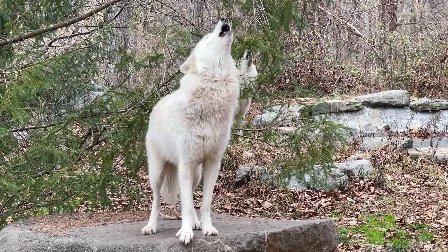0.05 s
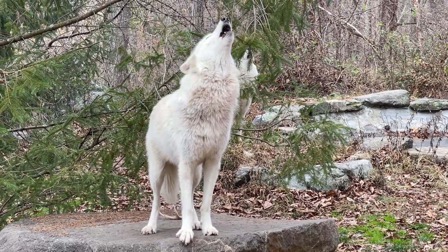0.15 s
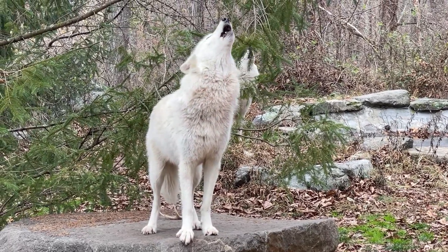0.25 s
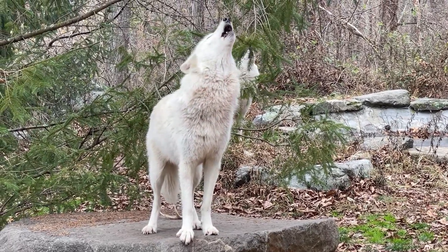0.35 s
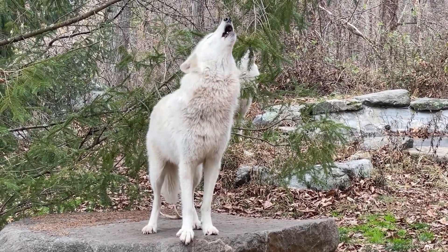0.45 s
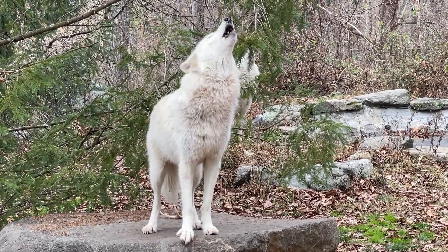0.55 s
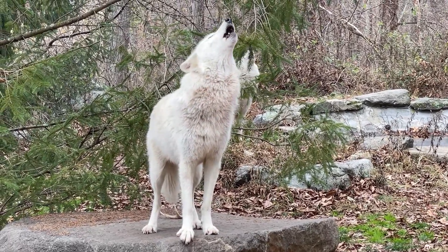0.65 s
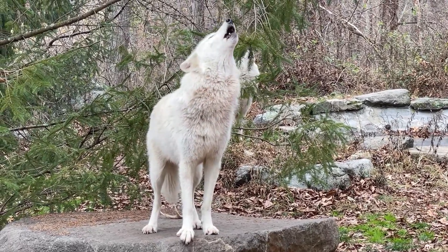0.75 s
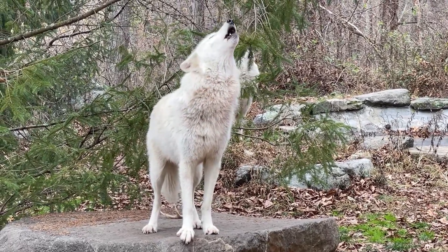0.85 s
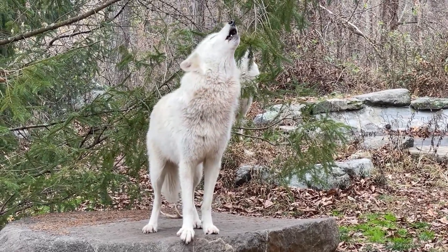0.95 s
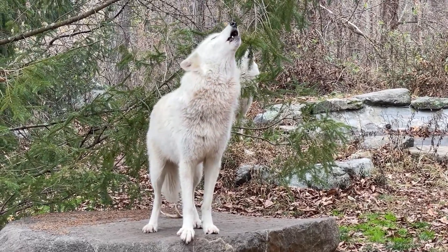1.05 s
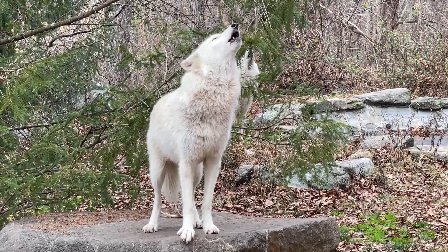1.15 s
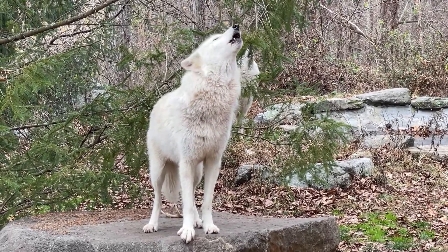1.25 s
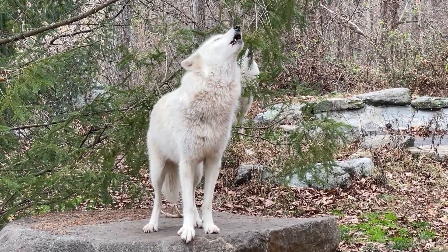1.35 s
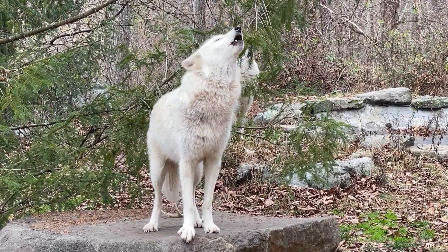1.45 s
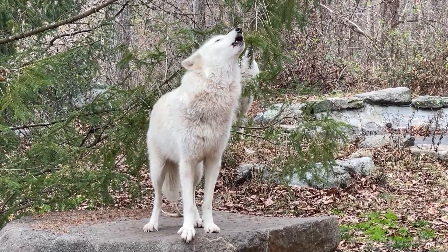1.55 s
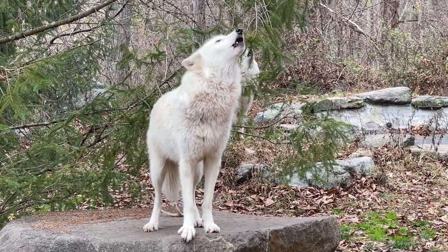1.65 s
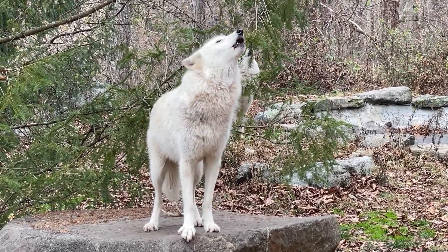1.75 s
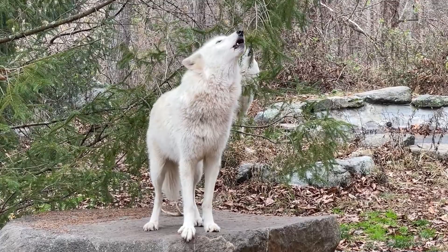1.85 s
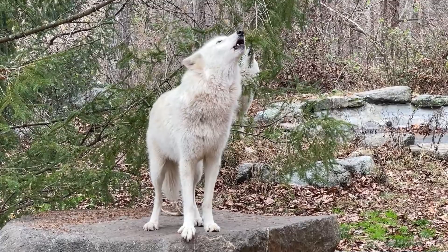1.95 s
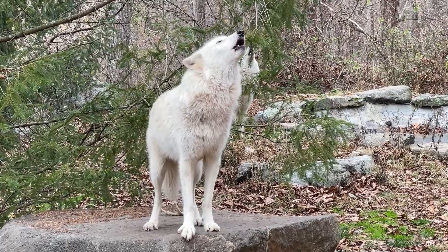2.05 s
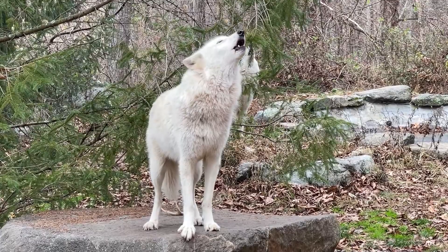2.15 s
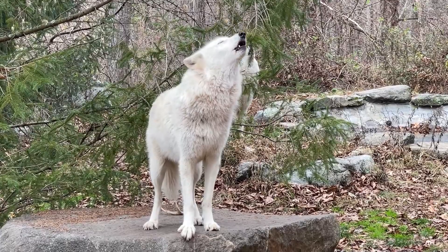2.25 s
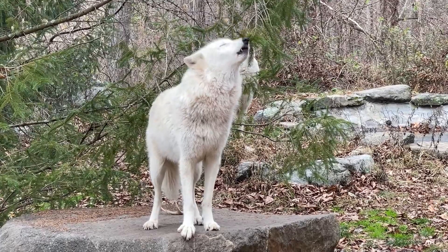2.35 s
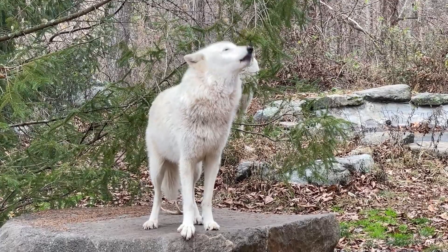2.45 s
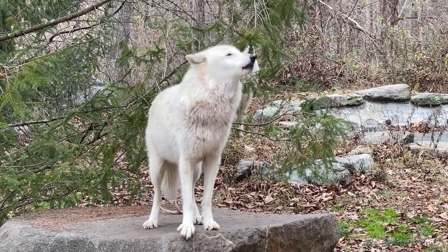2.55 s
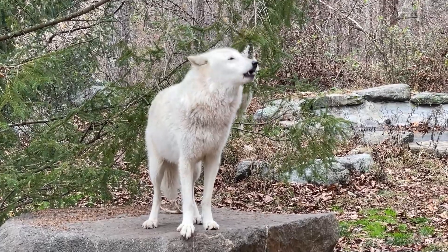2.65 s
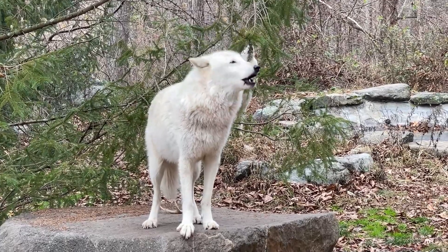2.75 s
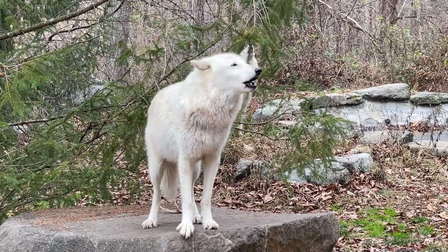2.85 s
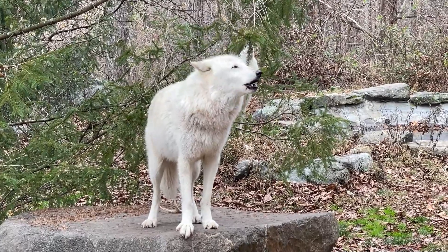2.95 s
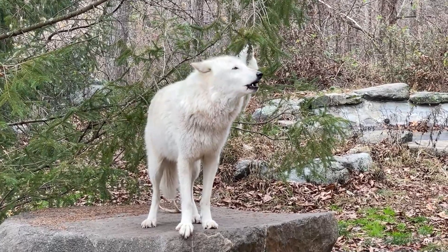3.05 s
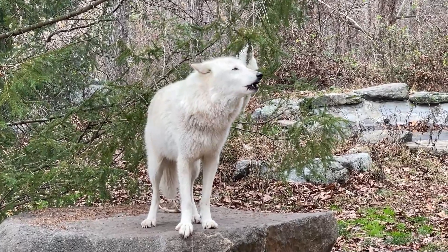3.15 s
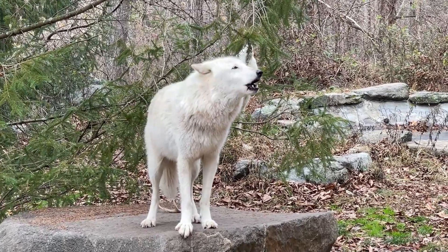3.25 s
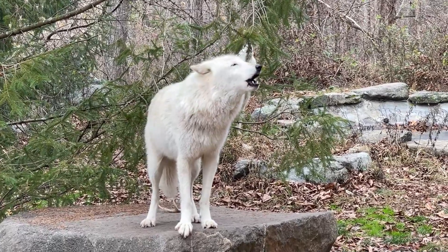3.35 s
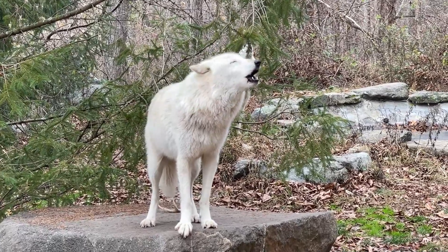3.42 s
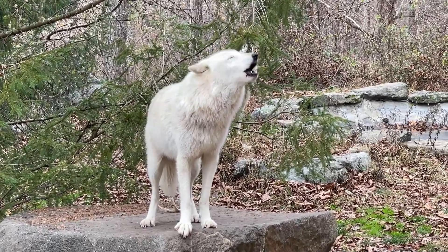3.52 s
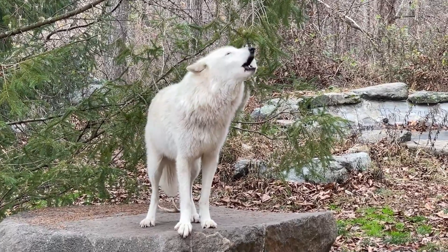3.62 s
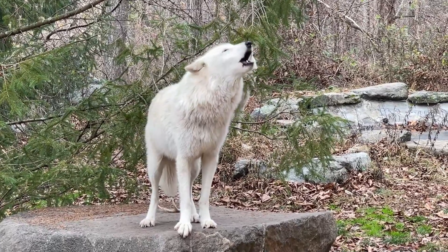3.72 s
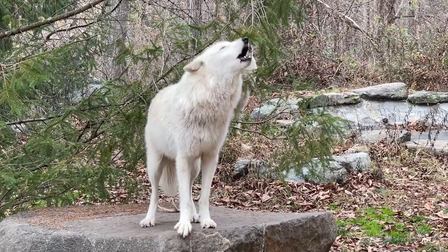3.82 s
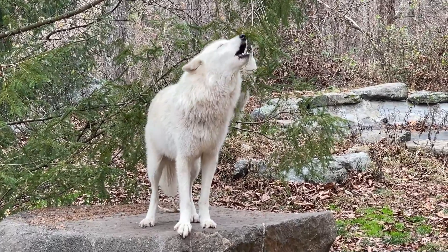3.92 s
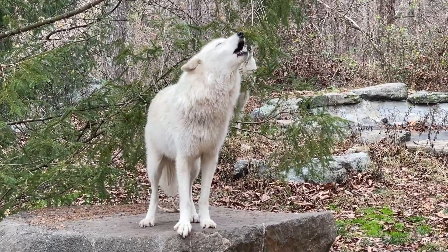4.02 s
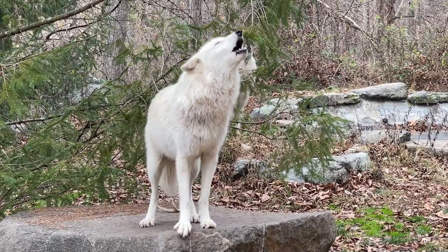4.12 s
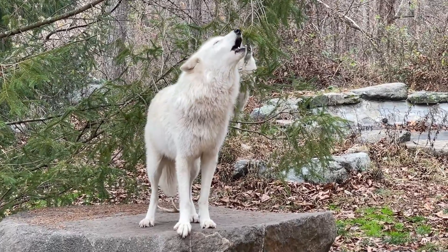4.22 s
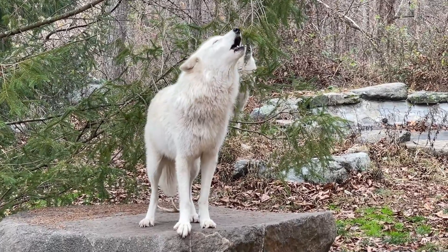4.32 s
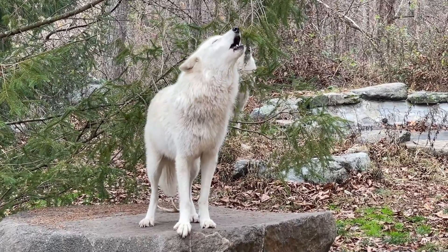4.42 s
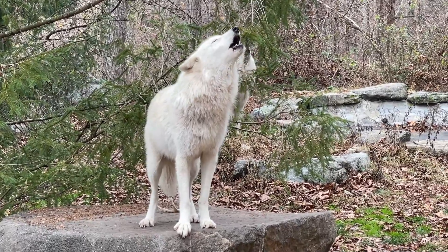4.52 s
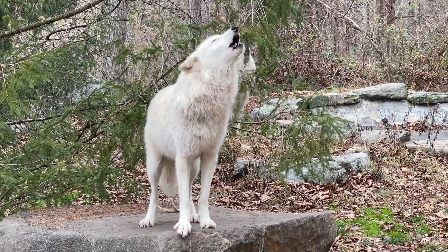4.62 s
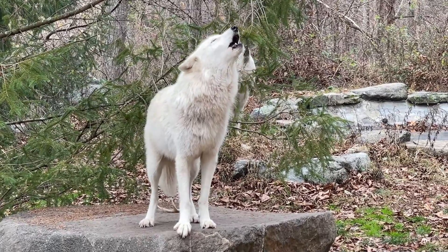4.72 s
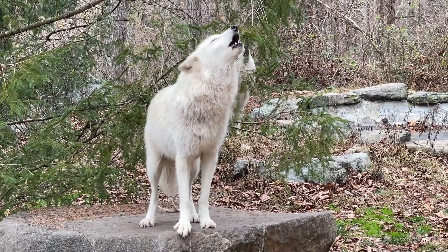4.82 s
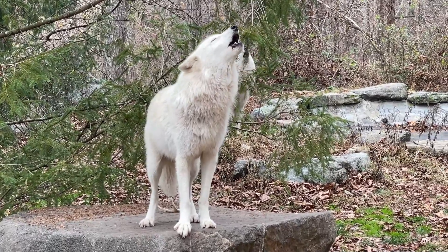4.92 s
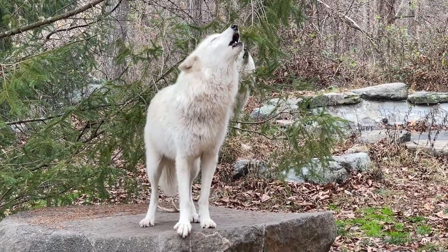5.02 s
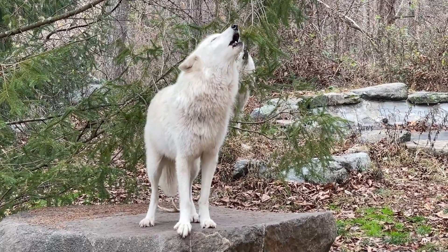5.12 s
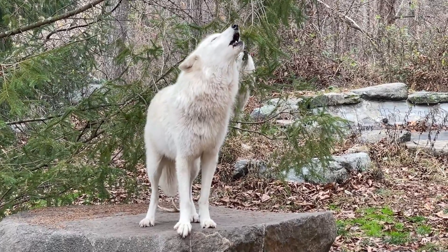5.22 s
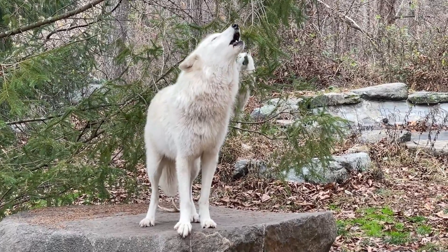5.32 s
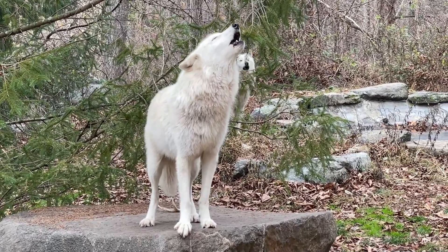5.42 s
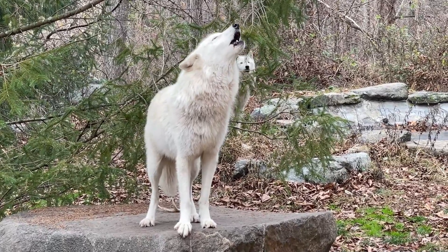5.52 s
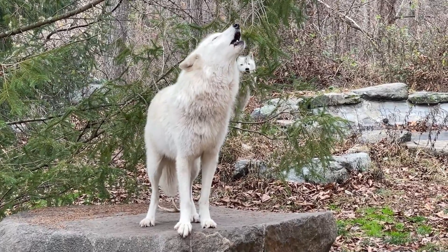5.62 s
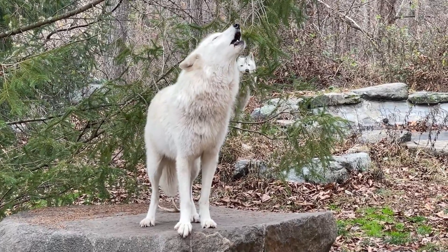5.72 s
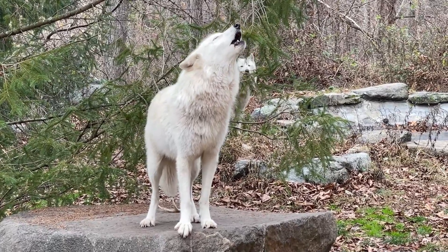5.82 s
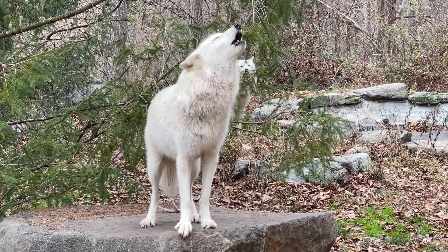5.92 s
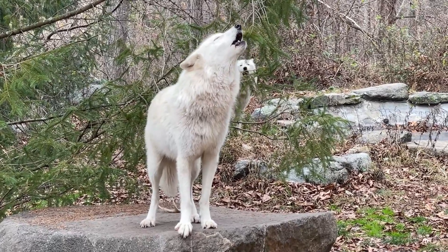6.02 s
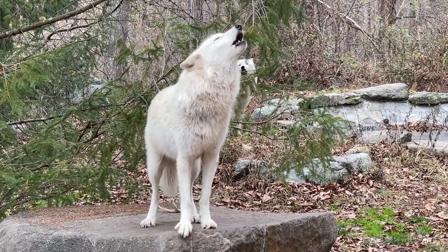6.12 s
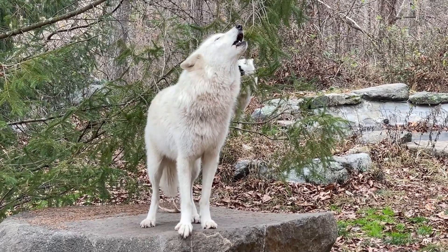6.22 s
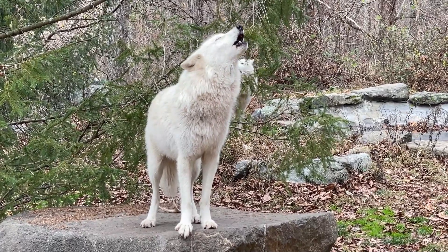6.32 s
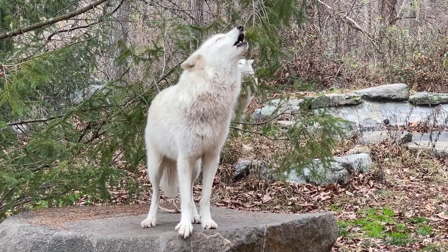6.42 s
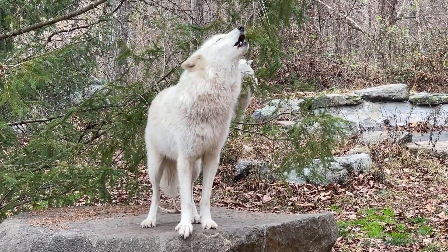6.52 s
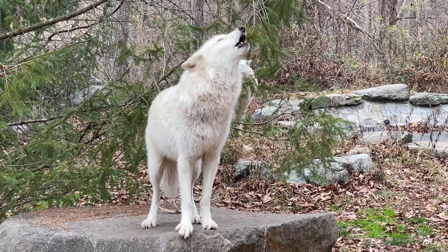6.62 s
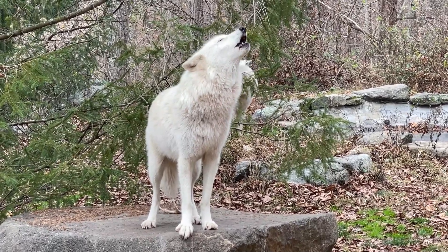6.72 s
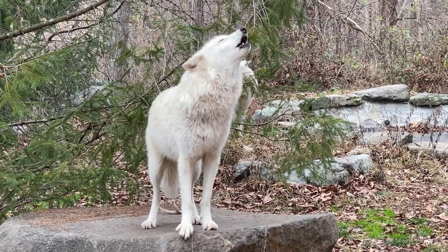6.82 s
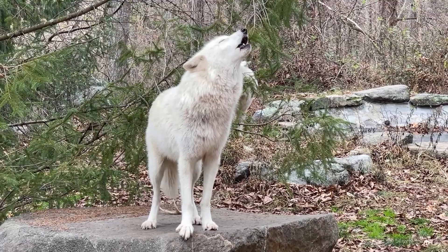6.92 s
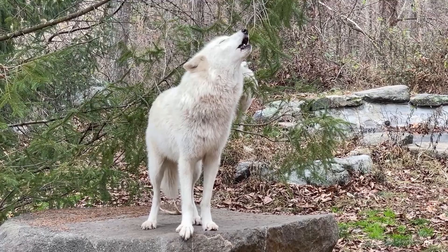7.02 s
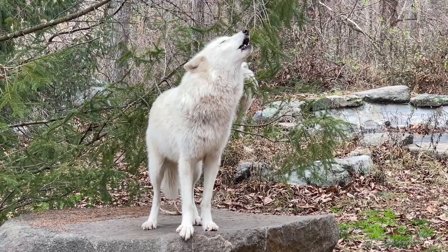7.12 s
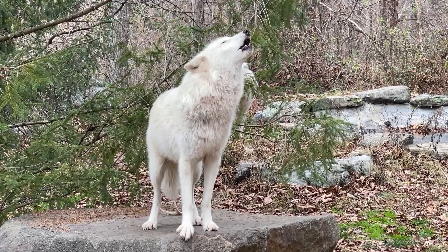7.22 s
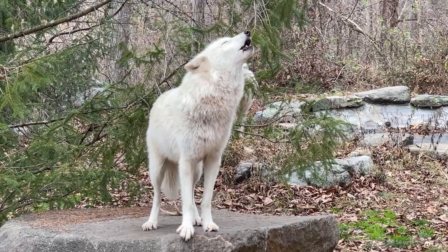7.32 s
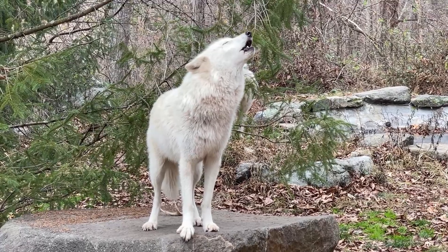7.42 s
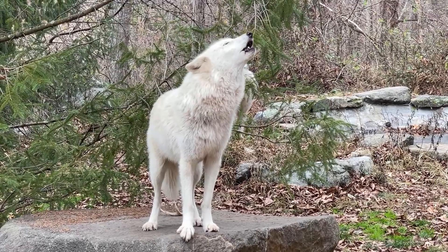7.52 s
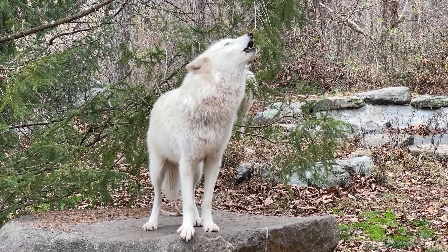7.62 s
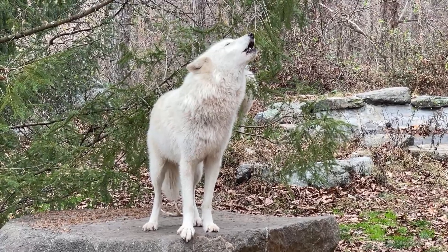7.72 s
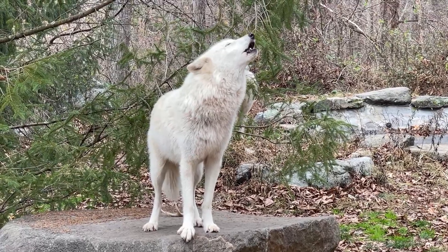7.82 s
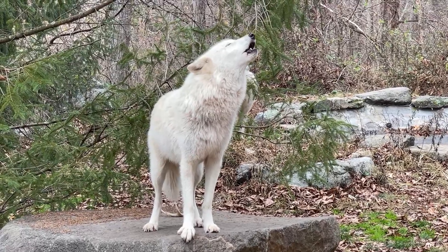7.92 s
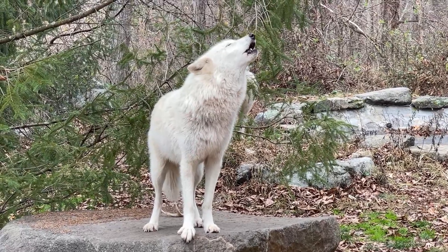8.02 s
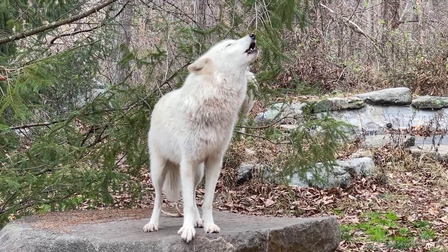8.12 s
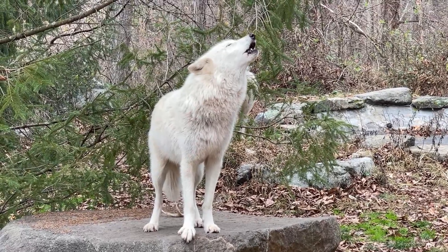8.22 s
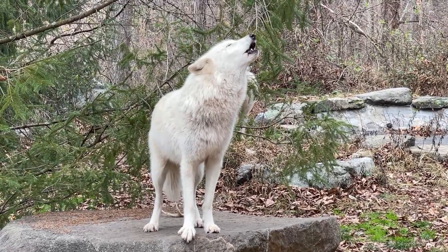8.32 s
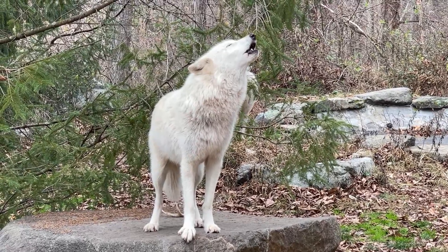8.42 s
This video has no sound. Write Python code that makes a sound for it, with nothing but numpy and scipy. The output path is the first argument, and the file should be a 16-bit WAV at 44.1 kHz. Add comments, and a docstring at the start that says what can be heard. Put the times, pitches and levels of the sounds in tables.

```python
"""Wolf duet in a wood

Two wolves howl almost dead centre of a microphone pair, their vocal folds ringing through throat and
mouth. The lower sings, pauses, returns cracked and rasping, then holds a long pure note; the higher
slides down, trails off and rises again. Behind them: a low hush and a faint echo off the trunks, with
two soft thuds on the ground near the end. A phone's limiter holds down the loudest peaks."""
import sys
import numpy as np
from scipy import signal
from scipy.fft import rfft, irfft, next_fast_len
from scipy.io import wavfile
from scipy.ndimage import uniform_filter1d

SR = 44100
rng = np.random.default_rng(int(sys.argv[2]) if len(sys.argv) > 2 else 0)


def pcm_store(signal):
    """Save signal as 16-bit PCM."""
    levels = np.round(np.clip(np.atleast_2d(signal), -1, 1) * 32767)
    wavfile.write(sys.argv[1], SR, levels.astype(np.int16).T)


N = 373086
TIME = np.arange(N) / SR

# the course of each howl, brighter as the mouth opens: time_s, pitch_hz, level_db, brightness_db
LOW_FIRST = [(0, 483.7, -13, 7.5), (.145, 465.7, -14, 1.5), (.2, 405, -10, -1.5), (.35, 396, -12.5, 2),
             (.56, 400.9, -12.5, 0.5), (.86, 419.5, -12, 0.5), (1.28, 375, -15, -2.5),
             (1.86, 354.6, -14, -0.5), (2.06, 413.2, -13, -4), (2.2, 400.6, -13.5, -7)]
LOW_CRACKED = [(3.27, 338, -28.5, 1.5), (3.39, 360.9, -24.5, 5), (3.405, 446, -7.5, -10.5),
               (3.515, 452, -10, -10), (3.545, 465.3, -22, 4), (3.66, 467, -25.5, 10.5),
               (3.8, 471.2, -16.5, 2.5), (4.14, 470.3, -15.5, 0.5), (4.4, 451, -21.5, 6)]
LOW_LONG = [(4.955, 498, -14.5, 1.5), (5.085, 473, -10.5, 3.5), (5.108, 424.6, -8, -0.5),
            (5.22, 422.1, -9.5, 0), (5.75, 414.7, -10, 0.5), (6.05, 403.7, -10.5, 4.5),
            (6.35, 397.9, -10.5, -0.5), (6.87, 385.6, -11.5, -5), (7.5, 379, -12, 1.5),
            (8.16, 381.6, -11, 1), (8.46, 391.7, -12, -5)]
HIGH_FALLING = [(0, 805, -19.5, 6), (.16, 781, -19.5, 0), (.23, 726, -16.5, -8.5),
                (.33, 704.7, -13.5, -8.5), (.65, 705, -15, -10.5), (1.1, 684.2, -17, -6),
                (1.46, 656, -19, -3.5), (1.65, 607, -22, -6.5), (1.71, 556, -27.5, 4),
                (2.1, 565.8, -31.5, 7), (2.43, 561, -24.5, 8), (2.6, 556.4, -24.5, 1.5),
                (2.96, 555.5, -23.5, 0), (3.16, 547, -25.5, 1.5), (3.75, 544.9, -29.5, 0.5),
                (4.95, 535, -29.5, 1), (5.26, 521, -41.5, 3.5), (5.42, 469, -44, 1)]
HIGH_RISING = [(6.1, 285, -57.5, 1), (6.4, 334.8, -57, 0), (6.56, 305.8, -41.5, -5.5),
               (6.78, 338.5, -46, 1), (7, 370.4, -22, -13.5), (7.38, 420, -32, -1.5),
               (7.415, 508.4, -40, 7.5), (7.6, 519, -42, 14), (7.81, 544, -39.5, 9.5), (8.15, 522, -43, 15),
               (8.29, 574.6, -39.5, 10), (8.46, 578.7, -39, 12.5)]
# throat and mouth resonances for each howl and for the second tone: frequency_hz, gain_db
LOW_FIRST_THROAT = [(1080, -8), (1250, -8), (1450, -22.5), (1650, -17), (1900, -15.5), (2150, -3.5),
                    (2400, -26.5), (2900, -41.5), (3300, -32), (3800, -44), (4200, -44), (4700, -35),
                    (5400, -47.5), (6200, -42), (7500, -54.5), (11000, -55.5)]
LOW_CRACKED_THROAT = [(1300.0, -1), (1420.0, 3.5), (1600.0, -33.5), (1870.0, 5), (2100.0, 3.5),
                      (2350.0, -29), (2800.0, -22.5), (3700.0, -20.5), (4300.0, -16), (4900.0, -48),
                      (5600.0, -23.5), (7000.0, -50.5), (9500.0, -36.5), (11000.0, -42.5)]
LOW_LONG_THROAT = [(1130.0, -4), (1280.0, -9), (1500.0, -40.5), (1680.0, 4), (1900.0, -5.5), (2120.0, -5),
                   (2400.0, -34.5), (3000.0, -36), (3900.0, -34.5), (4800.0, -44), (5700.0, -40.5),
                   (7500.0, -54), (11000.0, -55)]
HIGH_FALLING_THROAT = [(1500, 3.5), (1900, -7), (2200, -9), (2750, -12), (3000, -22), (3190, -7),
                       (3380, -22), (3530, 5), (3950, -6), (4200, -25.5), (4480, -11.5), (5000, -31.5),
                       (6700, -28), (11500, -43.5)]
HIGH_RISING_THROAT = [(900.0, 1.5), (1250.0, -0.5), (1550.0, -19), (1750.0, -19.5), (2100.0, -30.5),
                      (2700.0, -36), (3300.0, -35.5), (4000.0, -30.5), (4700.0, -36), (5500.0, -47.5),
                      (6600.0, -47.5), (8000.0, -56.5), (11000.0, -56)]
SECOND_TONE_THROAT = [(300, -35), (650, 7.5), (930, 3.5), (1160, -3.5), (1360, 4), (1590, -28), (1820, 5.5),
                      (2090, -8), (2380, -26.5), (2750, -27.5), (3200, -30), (3800, -41), (4300, -18.5),
                      (4900, -40.5), (5650, -26.5), (6200, -41.5), (7500, -48.5), (11500, -51)]
# the mouth resonance that lifts the octave as it slides past: centre_hz, width_hz, lift_db
LOW_MOUTH = (960, 91, 11)
HIGH_FALLING_MOUTH = (1115, 170, 27)
HIGH_RISING_MOUTH = (1160, 99, 9.4)
# a voice breaks into chaos: start_s, end_s, attack_s, release_s, first_hz, last_hz, chest_db, rasp_db,
# burst_rate_hz, final_depth_db, wolf, rasp_kind
VOICE_BREAKS = [(0, 0.185, 0.0078, 0.035, 478, 476, -57.5, -42.5, 43, -1, "low", "onset"),
                (0.075, 0.217, 0.074, .04, 480, 419.5, -39, -40, 37, -2.5, "low", "onset"),
                (3.21, 3.418, 0.037, .04, 485, 479.8, -20, -30, 29.2, 6.5, "low", "onset"),
                (3.498, 3.564, 0.032, 0.028, 510, 553, -20.5, -26.5, 40, 1, "low", "onset"),
                (3.62, 4.3, .22, .1, 475, 500, -56, -43, 44, 1, "low", "long"),
                (4.019, 4.995, .3, .05, 575, 511, -18, -23.5, 43.6, 13, "low", "long"),
                (5.058, 5.14, .038, 0.033, 490, 429.8, -27.5, -29.5, 44, 3, "low", "long"),
                (7.376, 7.474, .03, .055, 450, 521.5, -40, -37.5, 40, 4, "high", "onset")]
# the two kinds of rasp in the throat: frequency_hz, gain_db
ONSET_RASP = [(600, -30), (720, -1.5), (890, 0), (1100, 5), (1250, -13.5), (1420, -9.5), (1650, -29.5),
              (1950, -22), (2300, -25), (3100, -27.5), (4400, -40), (6300, -45.5), (9000, -47),
              (12000, -53)]
LONG_RASP = [(620, -23), (740, 13.5), (920, -7.5), (1100, -9), (1280, 5.5), (1420, -20.5), (1540, -39),
             (1740, -6.5), (1900, -17), (2100, -16.5), (2450, -43), (2750, -31.5), (3150, -42.5),
             (3750, -30.5), (4600, -42.5), (5600, -33), (7000, -54.5), (11500, -50.5), (13000, -79.5)]
# the part of a voice that differs between the two microphones: frequency_hz, gain_db
MIC_SPREAD = [(400, -32.5), (600, -19.5), (1100, -17.5), (2000, -17.5), (5000, -10)]
# background air in the wood: frequency_hz, gain_db
AIR_SPECTRUM = [(25, -27.5), (55, -19.5), (78, -13), (115, -5), (160, -10), (240, -13), (450, -5.5),
                (750, -11), (1300, -19.5), (2000, -26.5), (4000, -32.5), (9000, -38.5), (15000, -53)]
# the low background hush, set lower under the loud howls and higher between them: time_s, level_db
HUSH_LEVEL = [(0, -48), (1.2, -51.5), (3, -47), (4.4, -46), (5.8, -54), (8.46, -48)]
# soft thuds on the ground: start_s, level_db
THUDS = [(8.195, -38), (8.28, -35)]


def undb(db):
    """Decibels to gain."""
    return 10 ** (np.asarray(db) / 20)


def curves(table):
    """The columns after time_s, at every sample."""
    time_s, *columns = np.transpose(table)
    return [np.interp(TIME, time_s, column) for column in columns]


def response(spectrum, hz):
    """Gain of a spectrum at the given frequencies."""
    frequency_hz, gain_db = np.transpose(spectrum)
    return undb(np.interp(np.log(hz + 1), np.log(frequency_hz), gain_db))


def colour(x, spectrum):
    """Filter by a spectrum and scale to rms 1."""
    size = next_fast_len(N)
    gain = response(spectrum, np.fft.rfftfreq(size, 1 / SR))
    shaped = irfft(rfft(x, size) * gain, size)[:N]
    return shaped / shaped.std()


def walk(rate_hz):
    """Smooth random drift of spread 1."""
    hold = max(int(SR / rate_hz), 2)
    steps = rng.standard_normal(N)[np.arange(N) // hold]
    drift = uniform_filter1d(uniform_filter1d(steps, hold), hold // 2)
    return drift / drift.std()


def waver(t, depth_db=3, rate_hz=7):
    """A random gain with which one overtone swells and fades on its own."""
    knots = rng.standard_normal(128)
    return undb(depth_db * np.interp(t * rate_hz, np.arange(len(knots)), knots))


def envelope(start_s, end_s, attack_s, release_s):
    """Linear attack, hold and release."""
    return np.clip(np.minimum((TIME - start_s) / attack_s, (end_s - TIME) / release_s), 0, 1)


def progress(start_s, end_s):
    """Runs from 0 to 1 during an event."""
    return np.clip((TIME - start_s) / (end_s - start_s), 0, 1)


def trembling_phase(hz, jitter):
    """Phase of an oscillator whose pitch trembles a little."""
    tremble = 0.37 * walk(160) + walk(35)
    return 2 * np.pi * np.cumsum(hz * (1 + jitter * tremble)) / SR


def howl(course, throat, mouth, octave_db, overtones_db, treble_db, strain_db_per_octave,
         octave_share, attack_s, release_s, jitter, flutter_db):
    """Harmonics of the vocal folds slide through the throat's resonances; an open mouth brightens them."""
    gate = envelope(course[0][0], course[-1][0], attack_s, release_s)
    on = gate > 0
    hz, level_db, bright_db = curves(course)
    phase = trembling_phase(hz, jitter)[on]
    t, hz, level_db, bright_db = TIME[on], hz[on], level_db[on], bright_db[on]
    mouth_hz, width_hz, lift_db = mouth
    mouth_db = lift_db * np.exp(-((2 * hz - mouth_hz) / width_hz) ** 2)
    octave = undb(octave_db + mouth_db + octave_share * bright_db)
    strain_octaves = np.maximum(np.log2(hz / np.median(hz)), 0)
    upper_db = bright_db + flutter_db * walk(25)[on]
    overtones = undb(upper_db + overtones_db)
    treble = undb(upper_db + treble_db + strain_db_per_octave * strain_octaves)
    voice = np.sin(phase) + octave * np.sin(2 * phase)
    for k in range(3, 27):
        treble_share = np.clip((k * hz - 2400) / 600, 0, 1)
        top_fade = np.clip((11800 - k * hz) / 500, 0, 1)
        gain = top_fade * (overtones + treble_share * (treble - overtones))
        voice += gain * response(throat, k * hz) * waver(t) * np.sin(k * phase)
    out = np.zeros(N)
    out[on] = np.sqrt(2) * undb(level_db) * voice
    return out * gate


def low_wolf():
    """The louder voice at the microphones: a first howl, a cracked return, then a long pure note."""
    first = howl(LOW_FIRST, LOW_FIRST_THROAT, LOW_MOUTH,
                 octave_db=-22.5, overtones_db=-29.5, treble_db=-28, strain_db_per_octave=48.5,
                 octave_share=0, attack_s=.0024, release_s=.055, jitter=.002, flutter_db=2.5)
    cracked = howl(LOW_CRACKED, LOW_CRACKED_THROAT, LOW_MOUTH,
                   octave_db=-36, overtones_db=-35, treble_db=-25.5, strain_db_per_octave=1.5,
                   octave_share=.53, attack_s=.031, release_s=.03, jitter=.003, flutter_db=2.5)
    held = howl(LOW_LONG, LOW_LONG_THROAT, LOW_MOUTH,
                octave_db=-24.5, overtones_db=-30.5, treble_db=-35, strain_db_per_octave=53,
                octave_share=-.65, attack_s=.013, release_s=.0017, jitter=.00081, flutter_db=.54)
    return first + cracked + held + voice_breaks("low") + second_tone() + whistle()


def high_wolf():
    """The softer voice: a long falling howl, then one that climbs and jumps up a register."""
    falling = howl(HIGH_FALLING, HIGH_FALLING_THROAT, HIGH_FALLING_MOUTH,
                   octave_db=-28.5, overtones_db=-29.5, treble_db=-30, strain_db_per_octave=-3,
                   octave_share=.95, attack_s=.0025, release_s=.015, jitter=.00067, flutter_db=1)
    rising = howl(HIGH_RISING, HIGH_RISING_THROAT, HIGH_RISING_MOUTH,
                  octave_db=-3.5, overtones_db=-6, treble_db=-13, strain_db_per_octave=-.5,
                  octave_share=.67, attack_s=.05, release_s=.005, jitter=.0035, flutter_db=2)
    return falling + rising + voice_breaks("high")


def voice_break(row, spectrum, scatter, breath_db, low_cut_hz):
    """The folds swing up and collapse in ever deeper bursts; their uneven closings rasp in the throat."""
    start_s, end_s, attack_s, release_s, first_hz, last_hz, chest_db, rasp_db, burst_hz, depth_db = row
    along = progress(start_s, end_s)
    hz = first_hz + (last_hz - first_hz) * along
    burst_cycles = np.cumsum(burst_hz * np.exp(0.37 * walk(50))) / SR
    swell = np.sin(2 * np.pi * burst_cycles)
    burst_db = depth_db * along * (swell - 0.11 * swell ** 2 + 0.19 * walk(60))
    fold_cycles = np.cumsum(hz * np.exp(scatter * walk(330))) / SR
    chest = np.sqrt(2) * np.sin(2 * np.pi * fold_cycles) * undb(chest_db + burst_db + walk(250))
    chest = signal.sosfilt(signal.butter(6, low_cut_hz, "high", fs=SR, output="sos"), chest)
    closings = np.diff(np.floor(fold_cycles), prepend=0)
    pulses = (closings - closings.mean()) / closings.std()
    breath = undb(breath_db) * rng.standard_normal(N)
    rasp = colour(pulses + breath, [(250, -76.5)] + list(spectrum)) * undb(rasp_db + 0.41 * burst_db)
    return envelope(start_s, end_s, attack_s, release_s) ** 2 * (chest + rasp)


def voice_breaks(wolf):
    """All the rough moments of one wolf."""
    out = np.zeros(N)
    for *row, who, rasp_kind in VOICE_BREAKS:
        if who == wolf and rasp_kind == "long":
            out += voice_break(row, LONG_RASP, scatter=.07, breath_db=-10, low_cut_hz=400)
        elif who == wolf:
            out += voice_break(row, ONSET_RASP, scatter=.105, breath_db=-9.5, low_cut_hz=330)
    return out


def whistle(hz=11030, width_hz=300, level_db=-64, full_above_hz=478, fall_db_per_hz=.3):
    """Air whistles thinly past the folds at the top of the low wolf's range and dies away below it."""
    fold_hz = curves([*LOW_FIRST, *LOW_CRACKED, *LOW_LONG])[0]
    fall_db = fall_db_per_hz * np.maximum(full_above_hz - fold_hz, 0)
    band = [(hz - 3 * width_hz, -50), (hz - width_hz, -14), (hz, 0),
            (hz + width_hz, -14), (hz + 2 * width_hz, -50)]
    return undb(level_db - fall_db + 2 * walk(50)) * colour(rng.standard_normal(N), band)


def at_microphones(voice, left_db):
    """A voice slightly off centre; its overtones reach the two microphones a little out of step."""
    size = next_fast_len(N + SR)
    spread = response(MIC_SPREAD, np.fft.rfftfreq(size, 1 / SR))
    side = irfft(1j * rfft(voice, size) * spread, size)[:N]  # a quarter cycle out of phase
    return np.outer(undb([left_db / 2, -left_db / 2]), voice) + np.outer([1, -1], side)


def background_air(side_db=-13.5, hiss_db=-54, split_hz=1500):
    """A faint steady hiss, and a low hush that sinks under the loud howls and comes back between them."""
    mid, side = (colour(rng.standard_normal(N), AIR_SPECTRUM) for _ in range(2))
    air = mid + undb(side_db) * np.outer([1, -1], side)
    hush = signal.sosfiltfilt(signal.butter(2, split_hz, fs=SR, output="sos"), air)
    hush_db = curves(HUSH_LEVEL)[0] + 1.5 * walk(5.6)
    return undb(hush_db) * hush + undb(hiss_db) * (air - hush)


def tree_echo(voices, t60_s=1.7, damp_hz=2200, delay_s=.02):
    """Trunks scatter a thin, dull echo, different at each microphone."""
    t = TIME[:N // 2]
    tail = rng.standard_normal((2, len(t))) * undb(-60 * t / t60_s) * (t > delay_s)
    tail /= np.sqrt((tail ** 2).sum(axis=1, keepdims=True))
    dull = signal.sosfilt(signal.butter(1, damp_hz, fs=SR, output="sos"), voices)
    return signal.fftconvolve(dull[None], tail, axes=1)[:, :N]


def second_tone(start_s=3.52, end_s=4.43, first_hz=705, sag_hz=95.8,
                gain_db=-32.5, sideband_db=-5.5, jitter=.0015, flutter_db=1.5):
    """A second oscillator in the low wolf's larynx sags ever faster while the folds chop it."""
    hz = first_hz - sag_hz * progress(start_s, end_s) ** 2.6
    gate = envelope(start_s, end_s, attack_s=.12, release_s=.13)
    on = gate > 0
    fold_hz = curves(LOW_CRACKED)[0]
    phase = trembling_phase(hz, jitter)[on]
    fold_phase = trembling_phase(fold_hz, jitter)[on]
    out = np.zeros(N)
    for k in range(1, 17):
        for side in (-1, 0, 1):  # chopping adds a line one fold pitch below and above each harmonic
            line_hz = k * hz[on] + side * fold_hz[on]
            gain = undb(abs(side) * sideband_db) * response(SECOND_TONE_THROAT, line_hz)
            out[on] += np.sqrt(2) * gain * np.sin(k * phase + side * fold_phase)
    return out * gate * undb(gain_db + flutter_db * walk(30))


def ground_thuds(hz=122, width_hz=70, decay_s=.0075):
    """Dull, soft knocks on the earth, the same at both microphones."""
    knocks = np.zeros(N)
    for start_s, level_db in THUDS:
        age = np.maximum(TIME - start_s, 0) / decay_s
        knocks += undb(level_db) * age * np.exp(1 - age)
    earth = [(40, -25), (hz, 0), (hz + width_hz, -4), (500, -40), (2000, -80)]
    return knocks * colour(rng.standard_normal(N), earth)


def scene():
    """From the microphones' spot: both wolves a touch left of centre, the quiet wood behind them."""
    low, high = low_wolf(), high_wolf()
    echo = undb(-30) * tree_echo(low + high)
    direct = at_microphones(low, left_db=.33) + at_microphones(high, left_db=1)
    return direct + echo + background_air() + ground_thuds()


def record(dry, knee_db=-6.5, makeup_db=.59, tick_db=-28, tick_chance=.36, top_hz=15800):
    """The phone's soft limiter eases down for peaks and ticks faintly under load; the top is cut."""
    block = 300  # samples
    peaks = np.pad(np.abs(dry).max(axis=0), (0, -N % block)).reshape(-1, block).max(axis=1)
    drive = peaks / undb(knee_db)
    gain = undb(makeup_db) * (1 + drive ** 10) ** (-1 / 10)
    gain = uniform_filter1d(np.repeat(gain, block), size=90)[:N]
    load = np.minimum(drive, 1) ** 2
    ticks = undb(tick_db) * load * rng.uniform(-1.3, 1, len(peaks))
    ticks *= rng.random(len(peaks)) < tick_chance
    tick_shape = np.linspace(1, 0, block) ** 30
    gain *= 1 + np.outer(ticks, tick_shape).ravel()[:N]
    return signal.sosfilt(signal.ellip(8, .2, 70, top_hz, fs=SR, output="sos"), dry * gain)


dry = scene()
out = record(dry)
pcm_store(out)
```